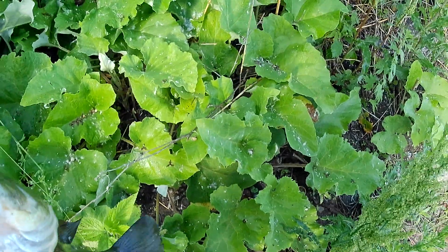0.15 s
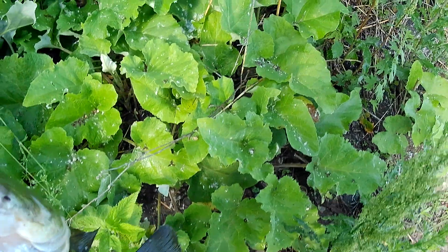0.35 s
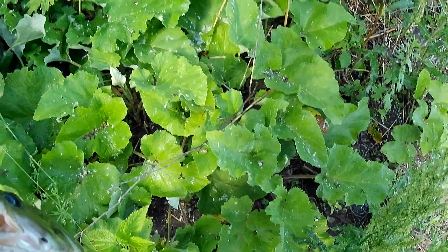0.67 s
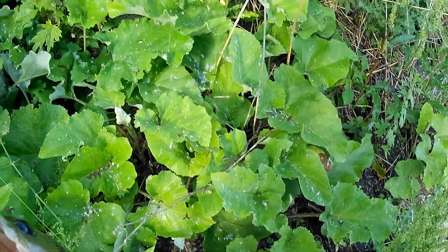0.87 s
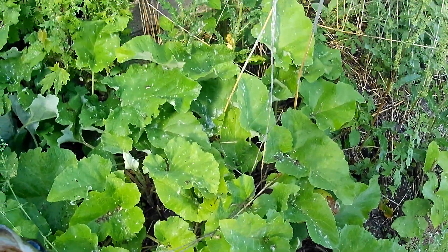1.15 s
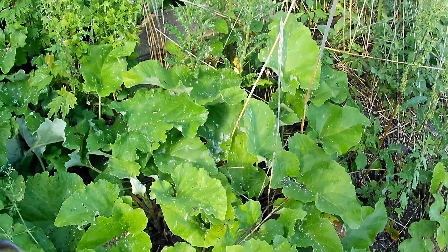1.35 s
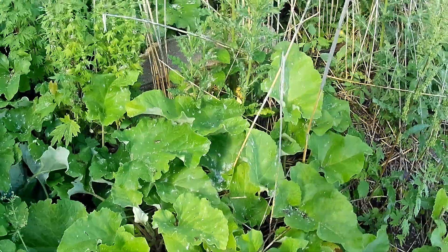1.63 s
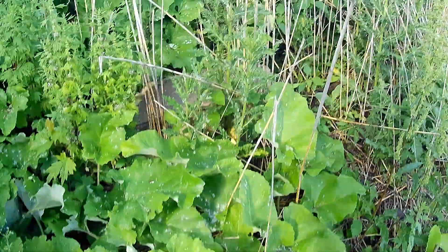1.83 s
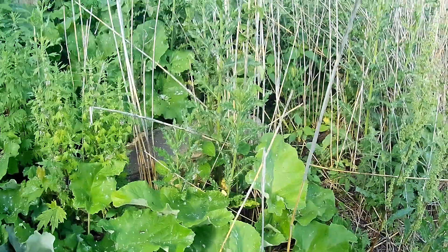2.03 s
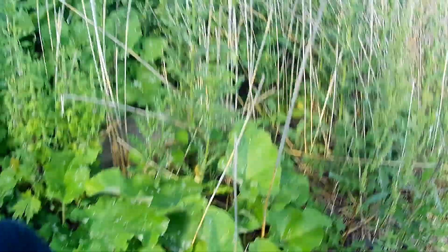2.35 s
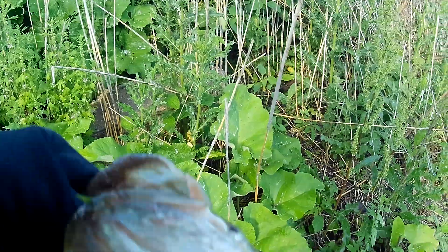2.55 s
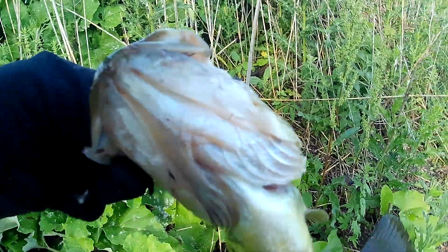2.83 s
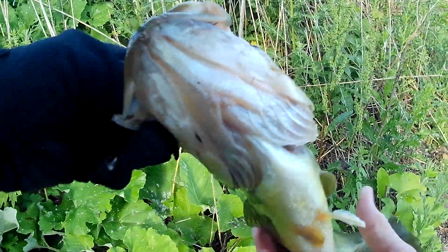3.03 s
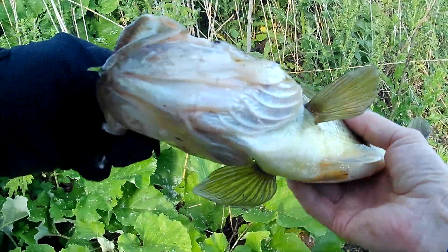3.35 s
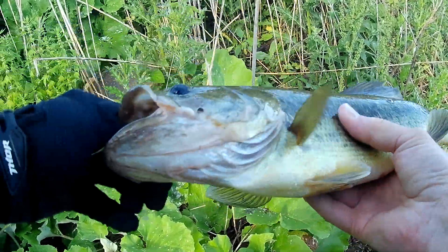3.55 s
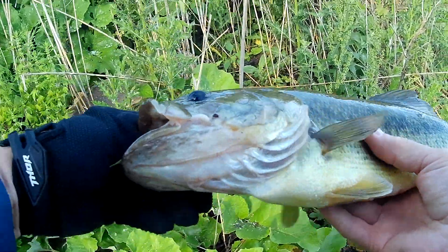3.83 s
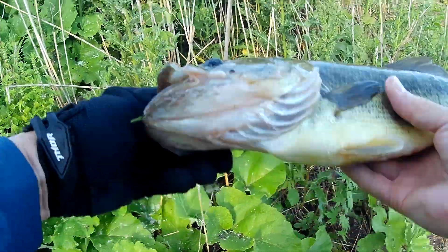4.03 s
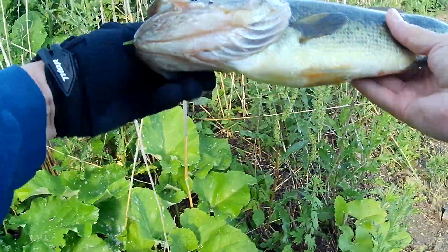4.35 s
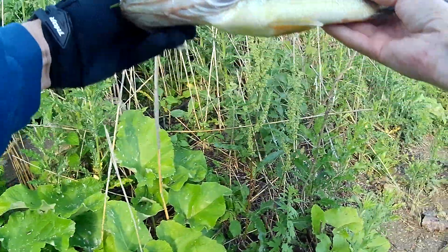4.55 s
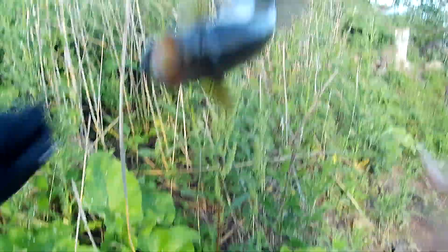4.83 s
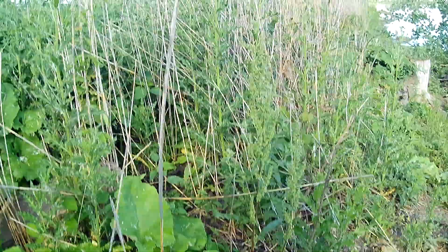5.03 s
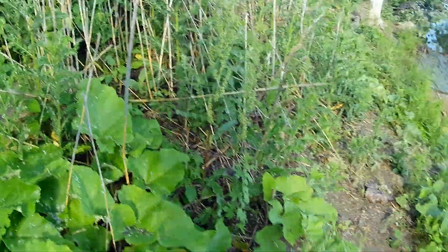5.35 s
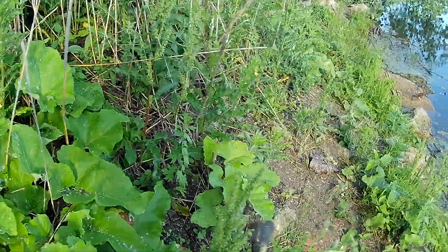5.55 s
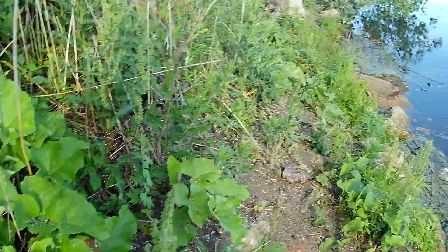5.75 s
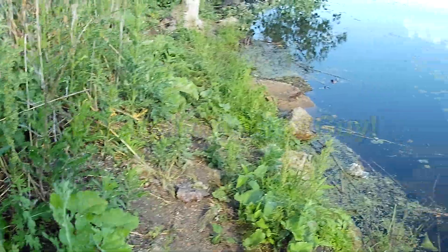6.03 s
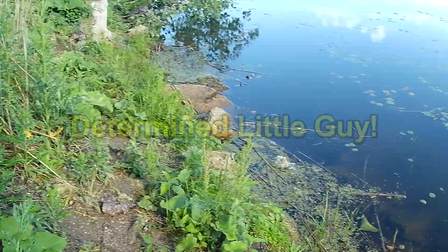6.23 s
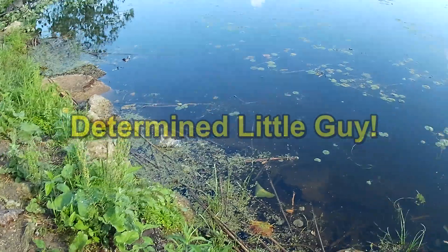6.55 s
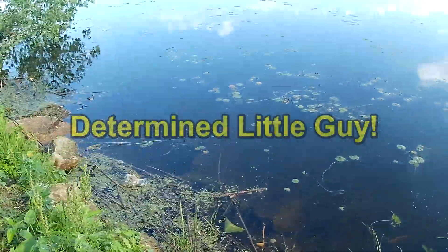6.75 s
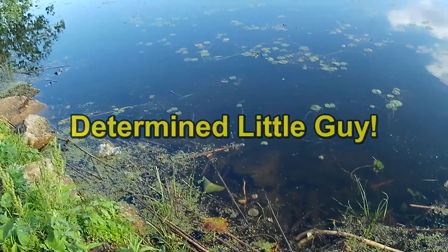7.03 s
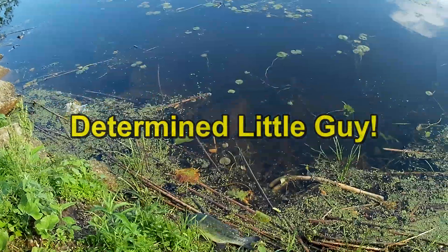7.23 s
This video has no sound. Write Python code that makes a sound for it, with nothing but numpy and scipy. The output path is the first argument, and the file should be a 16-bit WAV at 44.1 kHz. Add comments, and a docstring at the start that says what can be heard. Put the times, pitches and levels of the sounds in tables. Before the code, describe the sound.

Birds whistle, chip and trill over a soft outdoor hush while a plastic case ticks, creaks and rubs close by, busiest in the last third.

```python
"""Pond bank, heard inside a sealed plastic case on an angler's chest harness while a fish is held and carried.
Hiss, wind rumble, leaves and far traffic are shaped noise; a far engine is noise in a low resonance.
Birds are gliding near-sines, some buzzing, with a blur from the trees; a distant chorus is shaped noise.
Close by, the case ticks and creaks as decaying modes, and harness and cloth rub it as strokes of grains."""
import sys
import numpy as np
from scipy import signal
from scipy.fft import rfft, irfft, next_fast_len
from scipy.io import wavfile

SR = 44100
rng = np.random.default_rng(int(sys.argv[2]) if len(sys.argv) > 2 else 0)


def wav_out(sig):
    """Save sig, one row per channel (or a flat mono array), as 16-bit PCM at SR to the path in sys.argv[1]."""
    wavfile.write(sys.argv[1], SR, np.round(np.clip(np.atleast_2d(sig).T, -1, 1) * 32767).astype(np.int16))


N = 325458


def amp(db):
    """dB to gain."""
    return 10 ** (np.asarray(db) / 20)


def rms_one(x):
    """Scale to rms 1."""
    return x / np.sqrt(np.mean(x ** 2) + 1e-20)


def level_db_in_time(rows):
    """Level curve in dB at every sample, linear between rows."""
    s, db = np.transpose(rows)
    return np.interp(np.arange(N) / SR, s, db)


def at_hz(points, hz):
    """Read a spectrum on a log-frequency axis."""
    points_hz, values = np.transpose(points)
    return np.interp(np.log(hz), np.log(points_hz), values)


def drift(rate_hz, size=N):
    """Slow random wander of rms 1: noise through two equal one-pole lowpasses."""
    r = np.exp(-2 * np.pi * rate_hz / SR)
    wander = signal.lfilter([1], [1, -2 * r, r * r], rng.standard_normal(size + SR))
    return rms_one(wander[SR:])


def ring(x, hz, t60_s):
    """Two-pole resonance: a unit click sets a decaying sine of height 1 ringing."""
    r, w = amp(-60 / (t60_s * SR)), 2 * np.pi * hz / SR
    return signal.lfilter([0, np.sin(w)], [1, -2 * r * np.cos(w), r * r], x + 1e-18)


def coloured(spectrum, likeness):
    """Stereo noise of rms 1 with a spectrum and, per frequency, a left-right correlation."""
    size = next_fast_len(N)
    hz = np.maximum(np.arange(size // 2 + 1) * SR / size, 10)
    mid, side = rfft(rng.standard_normal((2, size)))
    alike = np.clip(at_hz(likeness, hz), -1, 1)
    gain = (hz > spectrum[0][0] / 2) * amp(at_hz(spectrum, hz))
    common = np.sqrt(1 + alike) * mid
    opposed = np.sqrt(1 - alike) * side * [[1], [-1]]
    return rms_one(irfft(gain * (common + opposed), size)[:, :N])


# Microphone noise spectrum. Each row: frequency in Hz, relative density in dB per Hz.
HISS_COLOUR = [(25, -13), (60, -6), (130, -3.5), (300, -6), (600, -18.5), (3000, -26), (8000, -36),
               (16000, -27)]
HISS_DB = -73


def hiss():
    """The microphones' own noise: steady, nearly unrelated left and right."""
    return amp(HISS_DB) * coloured(HISS_COLOUR, [(20, 0.24), (16000, 0.071)])


# Wind on the case. Each row: time in seconds, level in dB.
RUMBLE_LEVEL = [(0, -86), (1.05, -78.5), (2.9, -85.5), (4.3, -78.5), (4.6, -73.5), (6.05, -75.5),
                (7.38, -82)]
# Rumble spectrum. Each row: frequency in Hz, relative density in dB per Hz.
RUMBLE_COLOUR = [(20, -17), (50, -1), (110, 3.5), (250, -5.5), (450, -33.5)]


def wind_rumble():
    """Wind on the case: low noise with a slowly wandering level, more alike left and right as pitch rises."""
    level_db = level_db_in_time(RUMBLE_LEVEL) + 3.6 * drift(3.1)
    return amp(level_db) * coloured(RUMBLE_COLOUR, [(20, 0.36), (450, 1.0)])


# Far engine drone: faint, swelling after 4.2 s, fading again at the end.
# Each row: time in seconds, level in dB before DRONE_TRIM_DB.
DRONE_LEVEL = [(0, -81), (4.2, -83), (4.55, -72.5), (6.3, -71.5), (7.38, -80)]
DRONE_HZ, DRONE_T60_S, DRONE_TRIM_DB = 63, 2.6 / 6.6, -3.0


def drone():
    """Far engine: noise through a narrow low resonance, partly its own in each channel."""
    noise = rng.standard_normal((2, N)) + 0.91 * rng.standard_normal(N)
    level_db = level_db_in_time(DRONE_LEVEL) + DRONE_TRIM_DB
    return amp(level_db) * rms_one(ring(noise, DRONE_HZ, DRONE_T60_S))


# Leaves and far traffic. Each row: time in seconds, level in dB.
AIR_LEVEL = [(0, -69), (1.5, -65.5), (2.5, -68.5), (4.4, -67.5), (5.05, -63.5), (6.05, -68), (7.38, -67)]
# Their spectrum through the case. Each row: frequency in Hz, relative density in dB per Hz.
AIR_COLOUR = [(180, -35), (300, -12), (550, -5), (779, 1), (1210, -6.5), (1840, -11), (2160, -10.5),
              (2340, -8), (3000, -17.5), (3900, -47), (6600, -120)]
# Left-right likeness of air and chorus. Each row: frequency in Hz, correlation from -1 to 1.
LIKENESS = [(60, 0.34), (110, 0.31), (200, 0.14), (380, 0.91), (700, 1), (1290, 0.96), (2380, 0.69),
            (4400, 0.84), (8120, 1), (15000, 0.13)]


def leaves_and_traffic():
    """Soft floor: partly spread noise, dulled by the case, its level wandering by about 1 dB."""
    level_db = level_db_in_time(AIR_LEVEL) + drift(5)
    return amp(level_db) * coloured(AIR_COLOUR, LIKENESS)


# Distant birds, plus a swell near 5.5 s that belongs with the rubbing of the case. Each row: time in seconds,
# level in dB.
CHORUS_LEVEL = [(0, -76), (.6, -73), (1.5, -72), (2.45, -64.5), (2.53, -79.5), (2.9, -72), (3.5, -76),
                (4.3, -74), (5.5, -66), (6.5, -72.5), (7.38, -72)]
# Chorus spectrum. Each row: frequency in Hz, relative density in dB per Hz.
CHORUS_COLOUR = [(1200, -2.5), (2000, -1.5), (2700, -1.5), (3700, 0.5), (5000, -5), (5800, -13),
                 (7500, -20), (9000, -27), (11000, -61)]


def chorus():
    """Distant birds blurred by the trees: partly spread noise with a wandering level."""
    level_db = level_db_in_time(CHORUS_LEVEL) + 1.5 * drift(8)
    return amp(level_db) * coloured(CHORUS_COLOUR, LIKENESS)


OVERTONE_DB = -28.5


def sing(hz, swell):
    """A near sine with faint second and third partials."""
    turn = 2 * np.pi * np.cumsum(hz) / SR
    overtones = np.sin(2 * turn) + np.sin(3 * turn) * (3 * hz < SR / 2)
    return swell * (np.sin(turn) + amp(OVERTONE_DB) * overtones)


# Levels of notes, whistles, seeps, phrases and chips are relative: add_note lifts them by NOTE_LIFT_DB;
# trills are not lifted.
# Single notes. Each row: start in seconds, length in seconds, first Hz, last Hz, level in dB, buzz 0-1.
NOTES = [(.2, 0.14, 2140, 2110, -64, 0.13), (0.705, 0.11, 2378, 2505, -68, 1),
         (1.222, 0.092, 2025, 2350, -65.5, 0.08), (1.55, 0.34, 1457, 1746, -68, .15),
         (1.92, 0.054, 4040, 2460, -60, 0.5), (2.001, 0.069, 2817, 4100, -57, 0.58),
         (2.06, 0.16, 3940, 4440, -62, 0.76), (2.152, 0.12, 5380, 5820, -78.5, .2),
         (2.14, 0.058, 10200, 11500, -78, .02), (2.195, .07, 11500, 11770, -79, .02),
         (2.298, 0.065, 3000, 2600, -62, 0.45), (2.473, 0.026, 3670, 4180, -64, 0.28),
         (2.498, 0.022, 4200, 2420, -69, 0.6), (2.53, 0.17, 6850, 6700, -87, 0.8),
         (2.93, 0.21, 6600, 6480, -88, 0.4), (3.0, 0.21, 2190, 2150, -79, 0.14),
         (3.1, 0.19, 5136, 5130, -72.5, 0.24), (3.338, 0.23, 4750, 4560, -78, 0.5),
         (3.688, .11, 4790, 4460, -66, 0.16), (3.893, 0.081, 3514, 3510, -71, 0.17),
         (4.118, .11, 4650, 4447, -59.5, 0.01), (4.228, 0.047, 2245, 2543, -66.5, 0.48),
         (4.28, .1, 2840, 2857, -69, 0.3), (3.79, .15, 5750, 5500, -84.5, 0.14),
         (4.31, .08, 5650, 5880, -86, .1), (4.36, .055, 9000, 9500, -83.5, .3),
         (4.375, 0.071, 3325, 3220, -70, 0.08), (4.397, 0.022, 2120, 1900, -60.5, 0.1),
         (4.369, .56, 4970, 5105, -80.5, .21), (4.448, 0.39, 3940, 3850, -76.5, 0.53),
         (4.482, 0.3, 2954, 2890, -69.5, 0.22), (5.028, 0.14, 7140, 7220, -77.5, 0.07),
         (6.428, 0.157, 5250, 5130, -73, 0.16)]
# One bird's falling whistles. Each row: start in seconds, length in seconds, first Hz, level in dB.
WHISTLES = [(.09, 0.089, 2370, -77.5), (0.433, .086, 2283, -62.5), (0.802, .13, 2374, -60.5),
            (1.001, .2, 2120, -71), (3.351, 0.17, 2263, -69.5), (3.825, .11, 2240, -68)]
# A thin high call. Each row: start in seconds, length in seconds, level in dB.
SEEPS = [(4.55, 0.28, -86.5), (5.5, 0.094, -85), (6.219, 0.063, -84), (6.828, 0.027, -74),
         (7.2, 0.25, -82.5)]
# A repeated two-part phrase. Each row: start in seconds, level in dB.
PHRASES = [(0.884, -68.5), (1.043, -62), (1.205, -63.5), (1.361, -60), (1.53, -60.5)]
# Notes of the phrase. Each row: start in seconds from the phrase, length in seconds,
# first, middle and last Hz, relative level in dB, buzz 0-1.
PHRASE = [(0, 0.022, 4410, 4035, 3540, 1.5, 0.1), (0.02, 0.01, 3750, 4040, 4370, 8, 0.1),
          (0.042, 0.0198, 3310, 3530, 4020, 3, 0), (.06, 0.054, 3257, 2983, 2850, -1.5, .6),
          (0.069, 0.075, 4250, 4200, 4130, -24, 0.3)]
# Quick falling chips, each answered lower. Each row: start in seconds, level in dB.
CHIPS = [(.33, -73), (.5, -64.5), (.643, -60.5), (.787, -58.5)]
# A chip and its answer. Each row: start in seconds from the chip, length in seconds,
# first, middle and last Hz, relative level in dB, buzz 0-1.
CHIP = [(0, 0.022, 5570, 4920, 4340, 0, 0.27), (0.1, 0.031, 4250, 3750, 3250, -5, 0.5)]
GLIDE_DONE_MIDWAY = 0.7   # share of a note's glide done by its middle
WHISTLE_FALL, WHISTLE_BUZZ = 0.86, 0.2   # last pitch over first; buzz 0-1
SEEP_HZ, SEEP_BUZZ = (8300, 8500, 8500), 0.15


def bird_notes():
    """All notes but the trills as start, length, first, middle and last Hz, level in dB, buzz."""
    notes = []
    for s, length_s, first, last, db, buzz in NOTES:
        notes.append((s, length_s, first, first + GLIDE_DONE_MIDWAY * (last - first), last, db, buzz))
    for s, length_s, first, db in WHISTLES:
        middle, last = first * (1 + WHISTLE_FALL) / 2, first * WHISTLE_FALL
        notes.append((s, length_s, first, middle, last, db, WHISTLE_BUZZ))
    for s, length_s, db in SEEPS:
        notes.append((s, length_s, *SEEP_HZ, db, SEEP_BUZZ))
    for repeats, pattern in ((PHRASES, PHRASE), (CHIPS, CHIP)):
        for s, db in repeats:
            for after_s, length_s, first, middle, last, note_db, buzz in pattern:
                notes.append((s + after_s, length_s, first, middle, last, db + note_db, buzz))
    return notes


NOTE_FADE_S, NOTE_LIFT_DB, BUZZ_PITCH_SPREAD = 0.0055, 2.5, 0.0773


def add_note(dry, note, flutter, scatter):
    """A note glides on a parabola through three pitches; buzz scatters its pitch and level."""
    s, length_s, first, middle, last, db, buzz = note
    i, u = int(s * SR), np.linspace(0, 1, int(length_s * SR))
    here = slice(i, i + len(u))
    hz = np.polyval(np.polyfit([0, .5, 1], [first, middle, last], 2), u)
    edges = np.clip(np.minimum(u, 1 - u) * length_s / NOTE_FADE_S, 0, 1)
    level_db = db + NOTE_LIFT_DB + (3.0 + 1.5 * buzz) * flutter[here]
    swell = edges * np.hanning(len(u)) ** 0.087 * amp(level_db)
    dry[here] += sing(hz * (1 + BUZZ_PITCH_SPREAD * buzz * scatter[here]), swell)


# A small bird's trills. Each row: start in seconds, level in dB at the middle of the warble.
TRILLS = [(1.758, -63), (1.841, -62.5)]
# Sweep up, then down. Each row: time in seconds from the start, pitch in Hz before the warble.
TRILL_PATH = [(0, 4390), (.012, 7500), (.019, 8200), (.026, 7300), (.044, 5380)]
WARBLE_FROM_S, WARBLE_HZ, WARBLE_DEPTH_HZ, WARBLE_DEPTH_DB = 0.019, 153.4, 930, 8.9


def add_trills(dry):
    """A pitch sweeps up, then warbles down, loudest at the bottom of each warble."""
    path_s, path_hz = np.transpose(TRILL_PATH)
    t = np.arange(int(path_s[-1] * SR)) / SR
    warble = np.cos(2 * np.pi * WARBLE_HZ * (t - WARBLE_FROM_S)) * (t > WARBLE_FROM_S)
    hz = np.interp(t, path_s, path_hz) + WARBLE_DEPTH_HZ * warble
    rise_and_fall = np.hanning(len(t)) ** 0.039
    for s, db in TRILLS:
        i = int(s * SR)
        dry[i:i + len(t)] += sing(hz, amp(db - WARBLE_DEPTH_DB * warble) * rise_and_fall)


TREES_T60_S, TREES_DB, FAR_LOSS_HZ = 0.52, -0.6, 13000   # level before the treble loss


def tree_blur(dry):
    """Trees throw back a duller blur: convolution with decaying noise, partly alike left and right."""
    t = np.arange(SR // 2) / SR
    echoes = rng.standard_normal((2, len(t))) * amp(-60 * t / TREES_T60_S) * (t > .008)
    echoes[1] = 0.54 * echoes[0] + 0.89 * echoes[1]
    echoes *= amp(TREES_DB) / np.sqrt(np.sum(echoes ** 2, axis=1, keepdims=True))
    echoes = signal.sosfilt(signal.butter(2, FAR_LOSS_HZ, fs=SR, output="sos"), echoes)
    return signal.fftconvolve(dry[None, :], echoes)[:, :N]


def birds():
    """Direct song in the centre plus its blur from the trees."""
    dry = np.zeros(N + SR)
    flutter, scatter = drift(60, N + SR), drift(328, N + SR)
    for note in bird_notes():
        add_note(dry, note, flutter, scatter)
    add_trills(dry)
    direct = dry[:N]
    return direct + tree_blur(direct)


SETTLE_S, SETTLE_DB = 0.17, -12   # time constant and level of the rustle


def strokes(starts_s, lengths_s, levels_db):
    """Gain of strokes that start quickly, die away and leave a faint rustle."""
    gain = np.zeros(N)
    for s, length_s, level_db in zip(starts_s, lengths_s, levels_db):
        here = slice(int(s * SR), min(int((s + length_s) * SR), N))
        u = np.linspace(0, 1, here.stop - here.start)
        gain[here] += np.sqrt(u) * (1 - u) * amp(level_db)
    r = np.exp(-1 / (SETTLE_S * SR))
    return gain + amp(SETTLE_DB) * signal.lfilter([1 - r], [1, -r], gain)


# Modes of the case. Each row: frequency in Hz, relative level in dB, undamped t60 in seconds.
CASE = [(981, -0.5, 0.02), (1120, -5.5, 0.026), (1503, -1.5, 0.011), (2010, -4.5, 0.0082), (2538, -4, 0.01),
        (3096, -3, 0.0042), (3762, -3.5, 0.0096), (4435, -4.5, 0.0043), (5470, 0.5, 0.0096),
        (6440, -1.5, 0.0052), (7640, 4.5, 0.0042), (8600, -3.5, 0.0035), (9200, -9, 0.0042)]
# Edges in Hz that part the low, middle, upper and top modes.
GROUP_EDGES_HZ = (1250, 2900, 4900)
# Harness and cloth on the case. Each row: start in seconds, length in seconds, relative level in dB,
# sharpness (upper and top modes) in dB re level, weight of the push (thud) in dB re level.
RUBS = [(0, 0.02, -57, -10, -30), (2.324, 0.03, -49, -3, -33), (2.358, 0.065, -50, -15, -30),
        (2.726, 0.46, -63.5, -6, -25), (4.639, 0.049, -55.5, -9, -13), (4.8, 0.095, -53.5, -2.5, -25),
        (4.923, 0.041, -49.5, 4.5, -27), (4.979, 0.11, -50, 5.5, -31), (5.17, 0.099, -51, 4.5, -5.5),
        (5.224, 0.054, -45, 7, -14), (5.267, 0.081, -52.5, 5.5, -28), (5.373, .045, -50, 7, -12),
        (5.674, 0.065, -55, 5, -17), (5.728, 0.041, -52, 7, -10), (5.778, 0.079, -52.5, 7.5, -12.5),
        (5.859, 0.043, -49.5, 3.5, -10), (6.094, 0.032, -54, 3, -14), (6.129, 0.084, -55.5, 5, -3),
        (6.273, 0.051, -60, -5, -6.5), (6.496, 0.052, -56, 3.5, -20), (6.575, .071, -66.5, 10.5, -18),
        (6.848, 0.066, -56.5, 5.2, -14.5), (7.18, 0.14, -60.5, -4, -19), (7.308, 0.12, -50, -8.5, -12.5)]
RUB_GROUP_DB = (0.5, 1, -3.5, -48)   # low to top modes
RUB_THUD_HZ, RUB_THUD_T60_S, THUD_GAIN = 515, 0.012, 2
GRAINS_PER_S, CLOTH_DAMPING = 4000, 0.62   # factor on t60


def rubbing():
    """Dense uneven grains ring in the case modes; a sharp stroke reaches the upper modes, a heavy one thuds."""
    grain_gain = amp(3.7 * np.minimum(rng.exponential(1, N), 3))
    grains = rng.standard_normal(N) * grain_gain * (rng.random(N) < GRAINS_PER_S / SR)
    groups = np.zeros((4, N))
    for k, (hz, mode_db, t60_s) in enumerate(CASE):
        group = np.searchsorted(GROUP_EDGES_HZ, hz)
        gain = (-1) ** k * amp(.5 * mode_db + RUB_GROUP_DB[group])
        groups[group] += gain * rms_one(ring(grains, hz, CLOTH_DAMPING * t60_s))
    s, length_s, db, sharp_db, weight_db = np.transpose(RUBS)
    dull = strokes(s, length_s, db) * (groups[0] + groups[1])
    bright = strokes(s, length_s, db + sharp_db) * (groups[2] + groups[3])
    thud_ring = ring(ring(grains, RUB_THUD_HZ, RUB_THUD_T60_S), RUB_THUD_HZ, RUB_THUD_T60_S)
    thud = THUD_GAIN * strokes(s, length_s, db + weight_db) * rms_one(thud_ring)
    rub = amp(2.3 * drift(60)) * (dull + bright + thud)
    return signal.sosfilt(signal.butter(4, [300, 8000], "band", fs=SR, output="sos"), rub)


# Single ticks of case and harness. Each row: start in seconds,
# level of low and middle modes in dB rms over 5 ms before the highpass,
# low over middle modes in dB, hardness (upper modes re level) in dB.
TICKS = [(0.0014, -45, -7.5, -13.5), (0.0276, -58, 1, -21), (0.3167, -47.5, -7.5, -6),
         (0.351, -52.5, -5, -15), (0.397, -56.5, -6, -3), (0.4395, -51, 5, -2.5), (0.4784, -46, -6, -9),
         (0.4824, -45, -6, -14), (0.517, -51.5, -5, -18), (1.461, -51.5, 4, -20), (1.5218, -45.5, 0, -11),
         (1.5314, -36.5, 0, 1), (1.5435, -45, 8, -10), (1.64, -48, -5, -9), (1.6507, -36, -7, -12.5),
         (1.7205, -53.5, -5, -4), (1.758, -29.5, 8, -30), (1.8117, -37, 7.5, -36), (1.9687, -45, 6.5, -26),
         (2.0444, -46.5, 9, -8), (2.135, -54, 9, -5), (2.2658, -45.5, 5.5, -13), (2.332, -46, 6, -20),
         (2.345, -44, -7, -19), (2.353, -29, -10, -6), (2.3783, -31, 17, -16), (2.3845, -38, 5, -14),
         (2.399, -31, 1, -13.5), (2.6742, -53.5, -5, -1), (4.6066, -54.5, 7, -17), (4.6632, -44.5, 21, -16),
         (4.814, -47.5, 9, -28), (4.8181, -46, 15, -20), (4.888, -37, 14, -24), (4.9147, -25, -0.5, -5.5),
         (4.93, -43, -12, -12), (4.9616, -27.5, -2, -3.5), (4.9932, -27.5, -1, -18), (5.004, -37.5, -4, -1),
         (5.057, -37.5, -7, -17), (5.077, -43, -9, -8), (5.0836, -43, -2, -16), (5.2835, -48.5, 5, -3),
         (5.392, -42.5, -4, -4), (5.445, -42, -7, -12), (5.5896, -41.5, 2, -6.5), (5.6, -48, 2, -10),
         (5.7911, -51.5, 4, 5.5), (5.8086, -39.5, -13, 6.5), (5.8221, -37.5, -3.5, -17),
         (5.8678, -47.5, 9, 2), (5.8755, -45.5, -9, 0.5), (5.9384, -46.5, -10, 0.5), (5.9567, -46, 8, -16),
         (6.1092, -47, -6, -6), (6.142, -46.5, 5, 0), (6.181, -50.5, -2, -6.5), (6.2624, -53, -6, -6.5),
         (6.2994, -55, 9, -13), (6.3827, -35.5, -4, -9), (6.392, -43.5, 0, -15), (6.4273, -51.5, -3, -10.5),
         (6.4772, -45, -7, -4.5), (6.5036, -43.5, -13, -12), (6.5089, -42.5, -4.5, -2.5),
         (6.537, -48, -7, -9), (6.569, -54, 5, -9), (6.593, -42.5, -17, -15), (6.601, -42, 3, -13.5),
         (6.649, -57.5, -6, -10), (6.6978, -50, 4, -15), (6.7191, -38, -3.5, -7.5),
         (6.7309, -42.5, -4, -12), (6.87, -53.5, 0, 2), (6.8924, -44.5, -6, -9.5), (6.9064, -52.5, -2, -8),
         (7.0919, -56, -7, -10), (7.194, -42.5, -12.5, 5), (7.2171, -48.5, -8, -10), (7.318, -54, -10, -7),
         (7.3283, -31, -2, -26)]
# Creaks, runs of slips. Each row: start in seconds, gap in seconds, first level in dB as for ticks,
# change per slip in dB, low over middle modes in dB, hardness in dB.
CREAKS = [(.564, 0.007, -47.5, -1, -7, -14.5), (5.0198, 0.006, -36, 2, -14.5, -7),
          (5.1906, 0.014, -41.5, 0.5, -3.5, -3), (5.2953, 0.0077, -36, 0.2, -1, -16),
          (5.4495, .0105, -36.5, -6, -8, -4), (5.6452, 0.0097, -48, 1.8, -1, -13),
          (5.6899, 0.0089, -33.5, -3, -4.5, -11), (7.341, 0.017, -53, 9.5, -5, -11)]
# Slips in each creak, a count per row of CREAKS.
CREAK_SLIPS = (3, 5, 5, 3, 5, 3, 4, 2)
# Top modes re upper ones at STRONG_DB; TOP_PER_DB more for each dB of contact strength.
TICK_TOP_DB, CREAK_TOP_DB, TOP_PER_DB, STRONG_DB = -15, -41, 0.67, -27.5


def contacts():
    """Times of all ticks and slips, and the gain that each gives the four groups of modes."""
    rows = [(*tick, TICK_TOP_DB) for tick in TICKS]
    for (s, gap_s, db, step_db, low_db, hard_db), slips in zip(CREAKS, CREAK_SLIPS):
        for k in range(slips):
            rows.append((s + k * gap_s, db + k * step_db, low_db, hard_db, CREAK_TOP_DB))
    s, db, low_db, hard_db, top_db = np.transpose(rows)
    middle = 1 / np.sqrt(1 + amp(low_db) ** 2)
    low = middle * amp(low_db)
    strength_db = db + np.maximum(hard_db, 0)
    top_db = top_db + TOP_PER_DB * (strength_db - STRONG_DB)
    return s, amp(db) * [low, middle, amp(hard_db), amp(hard_db + top_db)]


RISE_S, SLIP_SPREAD_DB, PITCH_SPREAD, SECOND_SLIP_DB = 0.00054, 3.5, 0.043, -7


def ticks_and_creaks():
    """A main slip and a weaker one 1-4 ms later ring the modes; pitch, strength and phase vary each time."""
    s, gains = contacts()
    t = np.arange(900) / SR
    chance = rng.standard_normal((len(s), len(CASE), 3))
    again_s = rng.uniform(0.001, 0.004, (len(s), 1))
    groups = np.zeros((4, len(s), len(t)))
    for k, (hz, mode_db, t60_s) in enumerate(CASE):
        group = np.searchsorted(GROUP_EDGES_HZ, hz)
        pitch_hz = hz * (1 + PITCH_SPREAD * chance[:, k, :1])
        for delay_s, slip_db in ((0, 0), (again_s, SECOND_SLIP_DB)):
            after_s = np.maximum(t - delay_s, 0)
            rise = (1 - np.exp(-after_s / RISE_S)) ** 2   # a soft contact keeps the treble out
            shape = rise * amp(-60 * after_s / t60_s)
            strength = amp(mode_db + slip_db + SLIP_SPREAD_DB * chance[:, k, 1:2])
            wave = np.sin(2 * np.pi * pitch_hz * after_s + chance[:, k, 2:])
            groups[group] += strength * shape * wave
    groups /= np.sqrt(np.sum(groups ** 2, axis=2, keepdims=True) / (.005 * SR))   # rms 1 over 5 ms
    out = np.zeros(N + len(t))
    at = (s * SR).astype(int)[:, None] + np.arange(len(t))
    np.add.at(out, at, np.sum(groups * gains[:, :, None], axis=0))
    return signal.sosfilt(signal.butter(4, 700, "high", fs=SR, output="sos"), out[:N])


def scene():
    """Sum of all layers; rubbing, ticks and creaks are central, the others spread to some degree."""
    floor = hiss() + wind_rumble() + drone() + leaves_and_traffic()
    return floor + chorus() + birds() + rubbing() + ticks_and_creaks()


CUTOFF_HZ = 15750   # 60 dB down from here


def record(dry):
    """The top is cut steeply."""
    return signal.sosfilt(signal.cheby2(14, 60, CUTOFF_HZ, fs=SR, output="sos"), dry)


dry = scene()
out = record(dry)
wav_out(out)
```